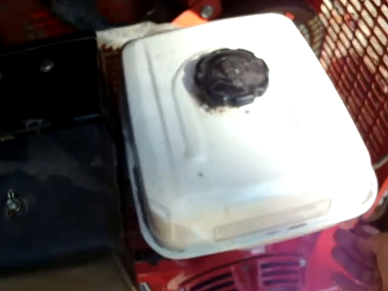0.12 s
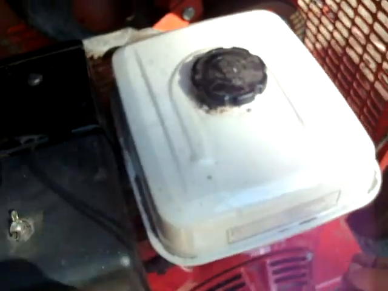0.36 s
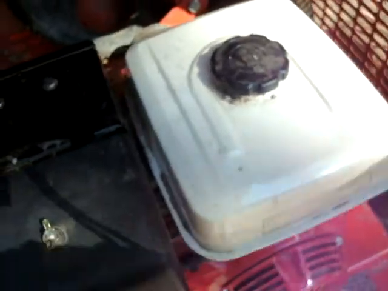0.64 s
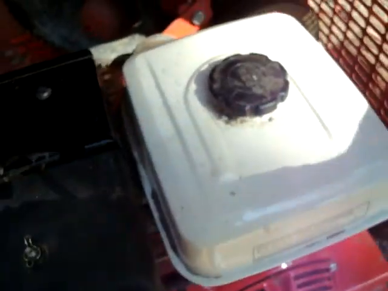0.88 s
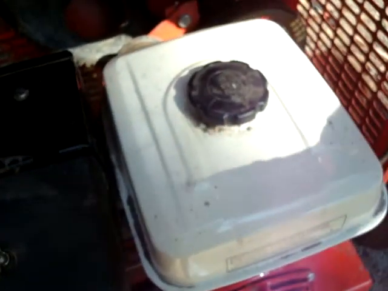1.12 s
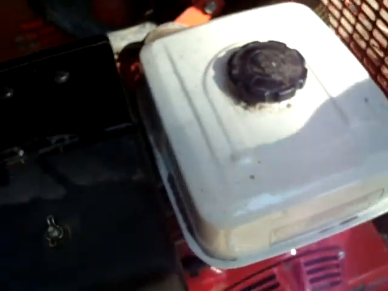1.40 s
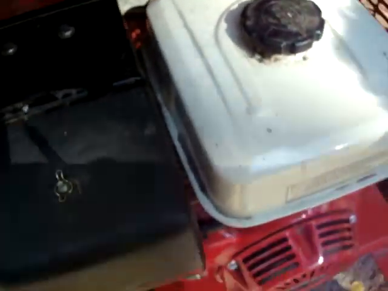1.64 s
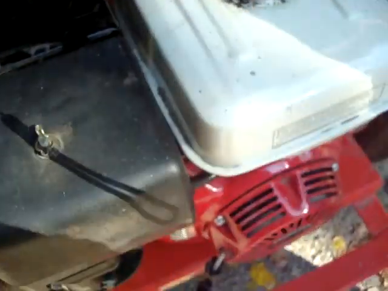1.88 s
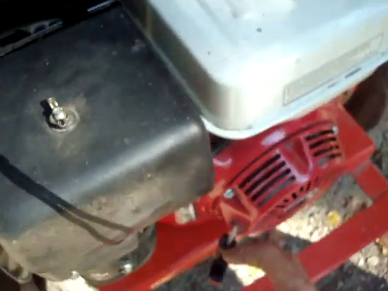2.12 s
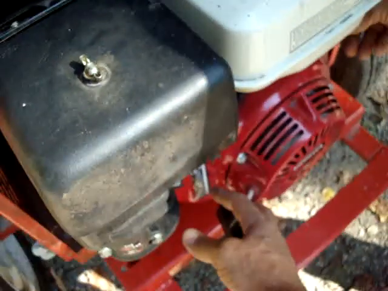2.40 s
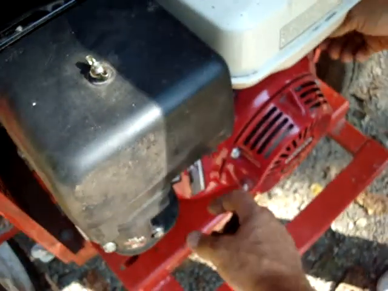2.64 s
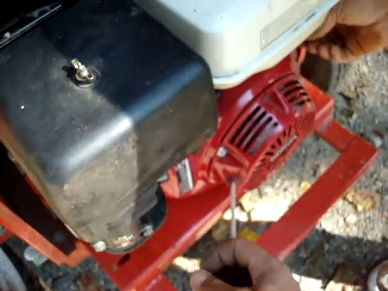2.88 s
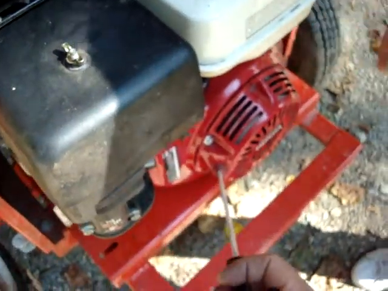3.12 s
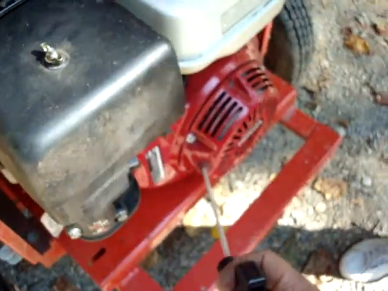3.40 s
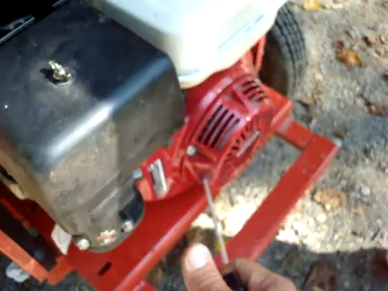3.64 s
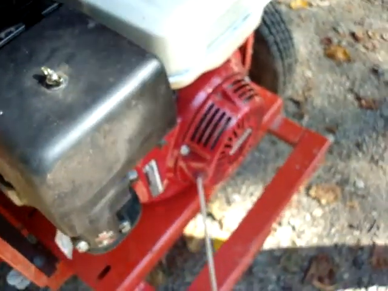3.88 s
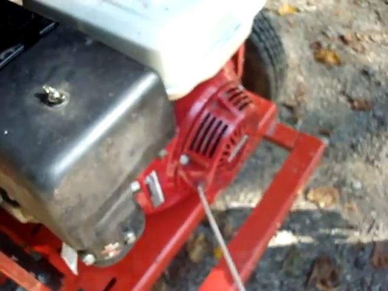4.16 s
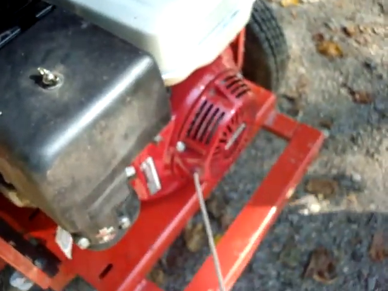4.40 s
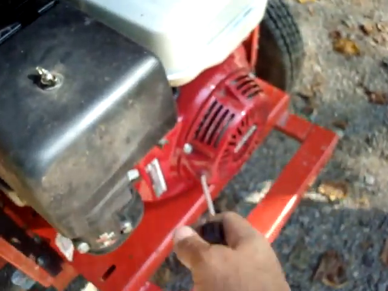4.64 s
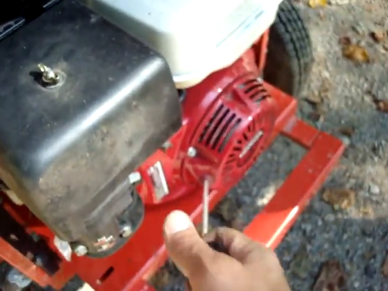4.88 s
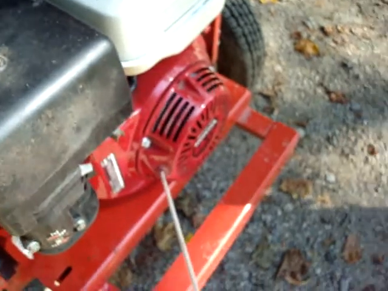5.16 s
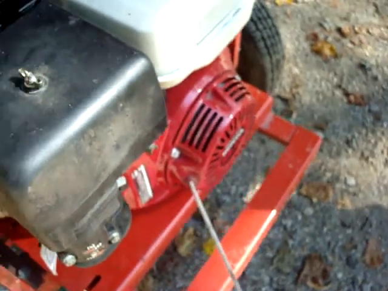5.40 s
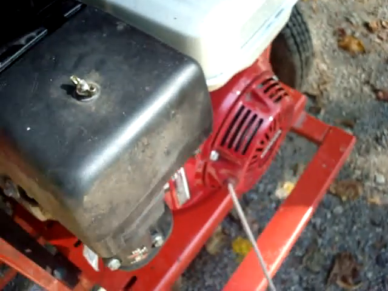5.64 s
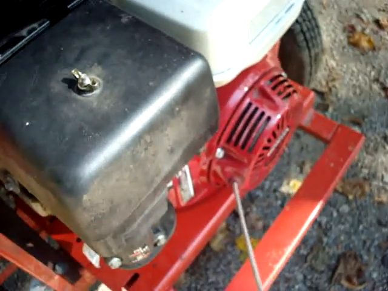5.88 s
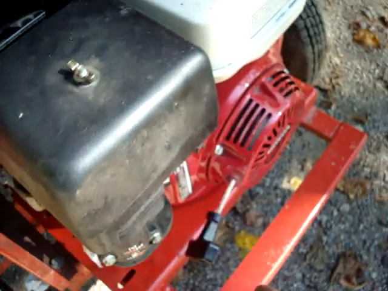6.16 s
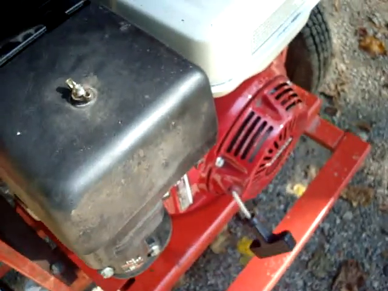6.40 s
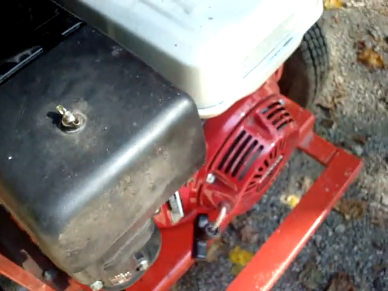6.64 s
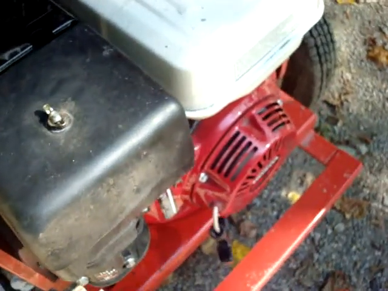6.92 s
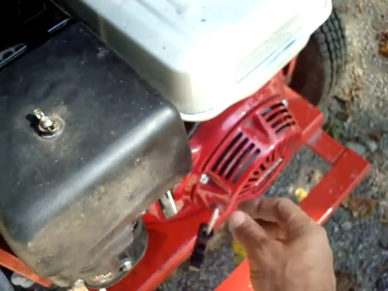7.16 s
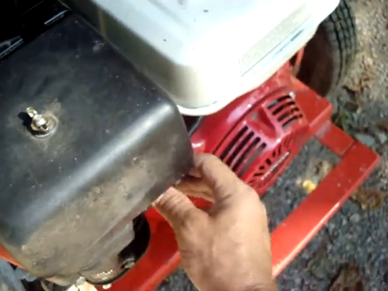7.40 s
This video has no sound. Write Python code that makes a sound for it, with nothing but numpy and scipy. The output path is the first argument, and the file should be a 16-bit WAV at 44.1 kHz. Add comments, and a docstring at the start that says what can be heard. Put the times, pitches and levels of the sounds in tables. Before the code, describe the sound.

Close outdoor microphone over soft distant traffic and low wind. Two noisy, hissing bangs come early and fade with a faint metal hum. Light rubs and clacks of a hand on a starter cord follow, then two rough bursts of rattling, knocking metal and piston thumps. Finally a small petrol engine catches, its separate puffs quickening into a loud, steady, rattling drone.

```python
"""A small one-cylinder petrol engine outdoors, close to the microphone: exhaust pulses ring pipe and muffler,
gas hisses, the valve knocks and the works rattle; it gathers speed and load into a steady drone.
Before it fires, a hand works the starter cord: rubs, clacks, blows on metal and thumps of the piston.
Behind it are distant traffic roar with a faint hum, low wind rumble and two hissing bangs,
all of shaped noise and decaying tones."""
import sys
import numpy as np
from scipy import signal
from scipy.fft import rfft, irfft, next_fast_len
from scipy.io import wavfile
from scipy.ndimage import uniform_filter1d

SR = 44100
rng = np.random.default_rng(int(sys.argv[2]) if len(sys.argv) > 2 else 0)


def master(y):
    """Save y as 16-bit WAV."""
    cut = np.clip(np.atleast_2d(y).T, -1, 1)
    pcm = np.round(cut * 32767)  # scale
    wavfile.write(sys.argv[1], SR, pcm.astype(np.int16))


def invert_db(x):
    """Field ratio 10**(x/20) for x, a level in decibels (scalar or array-like)."""
    u = np.asarray(x, float) / 20
    return 10 ** u


N = 332073
T = np.arange(N) / SR

# Firing rate of the running engine. Each row: time in seconds, rate in Hz.
SPEED = [(5.69, 5.97), (5.8, 6.84), (5.9, 8.08), (6.0, 10.48), (6.1, 14.03), (6.2, 18.2), (6.3, 22.56),
         (6.42, 24.69), (6.6, 24.73), (6.8, 24.9), (7.1, 25.09), (7.53, 25.35)]
# Load taken up by the engine. Each row: time in seconds, share 0-1.
LOAD = [(6.3, 0.02), (6.45, 0.13), (6.6, 0.43), (6.72, 0.82), (6.85, 0.91), (7.25, 1), (7.53, 0.98)]
FULL_SPEED_HZ = 25
# The firing pattern changes from catching to steady between these times, s.
STEADY_FROM_S = (6.33, 6.37)


def evened(x):
    """Scales to rms 1."""
    return x / np.sqrt(np.mean(x ** 2) + 1e-20)


def read(points, hz):
    """Reads a spectrum on a log-frequency axis."""
    f, value = np.transpose(points)
    return np.interp(np.log(hz + 1), np.log(f + 1), value)


def curve(rows, off_db=-120):
    """Gains of the dB columns of a table, off_db outside it."""
    s, *columns = np.transpose(rows)
    return [invert_db(np.interp(T, s, c, off_db, off_db)) for c in columns]


def noise(tone):
    """Steady noise of rms 1 with a given spectrum."""
    size = next_fast_len(N)
    z = rfft(rng.standard_normal(size)) * invert_db(read(tone, np.fft.rfftfreq(size, 1 / SR)))
    return evened(irfft(z, size)[:N])


def wander(hz):
    """Low-passed noise of rms 1, a slow random drift."""
    return evened(signal.lfilter(*signal.butter(1, hz, fs=SR), rng.standard_normal(N)))


def ring(x, modes):
    """Sum of two-pole resonances, each with its gain at its centre."""
    out = 0
    for hz, width_hz, db in modes:
        r = np.exp(-np.pi * width_hz / SR)
        pole = r * np.exp(2j * np.pi * hz / SR)
        out = out + invert_db(db) * 2 * signal.lfilter([1 - r], [1, -pole], x).real
    return out


def add(out, s, db, hz, t60, stray):
    """Adds one decaying tone with a soft start; stray is its relative pitch deviation."""
    part = out[round(s * SR):][:3 * SR // 2]
    t = np.arange(len(part)) / SR
    cycles = hz * np.cumsum(1 + stray[:len(t)]) / SR
    part += invert_db(db - 60 * t / t60) * (1 - np.exp(-t / 0.00061)) * np.sin(2 * np.pi * cycles)


def patchy(x, depth_db):
    """Colour that shifts in patches some 690 Hz wide and 29 ms long, milder from 6.8 s on."""
    _, t, z = signal.stft(x, SR, nperseg=256)
    patches = uniform_filter1d(rng.standard_normal(z.shape), 4, 0)
    patches = evened(uniform_filter1d(patches, 10, 1))
    calm = np.interp(t, (6.4, 6.8), (1, .4))
    return evened(signal.istft(z * invert_db(depth_db * calm * patches), nperseg=256)[1][:N])


def rippled(x):
    """A fixed random colour of narrow peaks some 40 Hz apart."""
    z = rfft(x)
    ripple_db = 2.5 * np.interp(np.arange(len(z)), np.linspace(0, len(z), 550), rng.standard_normal(550))
    return evened(irfft(z * invert_db(ripple_db), len(x)))


def roar():
    """Far traffic roar with a faint hum: sinks after the second bang, recovers, fades under the running engine."""
    # Each row: time in seconds, level in dB.
    roar_level = [(0.0, -29.5), (1.1, -31), (1.49, -29), (1.54, -27.5), (1.85, -36.5), (2.3, -38),
                  (3.65, -33), (4.3, -30), (4.65, -35), (5.6, -33), (5.9, -29), (7.53, -65)]
    # Each row: frequency in Hz, relative density in dB.
    roar_tone = [(82, -53), (140, -19.5), (371, -11.5), (541, -8), (603, -6), (791, 1), (881, 0.5),
                 (1110, 2.5), (1690, -3.5), (5640, -27.5), (7950, -31.5), (9870, -36), (10400, -71),
                 (13500, -73), (22000, -120)]
    # Each row: frequency in Hz, relative level in dB.
    hum_tones = [(118.4, -72), (193.8, -71), (296.1, -67.5), (409.1, -58)]
    lift_db = 35
    hum = 0
    for hz, db in hum_tones:
        level = invert_db(db + lift_db + 6.3 * wander(1.1))
        hum = hum + level * np.sin(2 * np.pi * hz * T + 0.49 * wander(2))
    return curve(roar_level)[0] * (invert_db(1.0 * wander(30)) * noise(roar_tone) + hum)


def wind():
    """Wind on the microphone: lumpy low rumble, gusts over a calm level."""
    # Each row: start in seconds, length in seconds, level in dB.
    gust_rows = [(-.3, 1.77, -55.5), (2.403, 0.56, -68), (3.38, 0.94, -61), (4.766, 0.2, -60.5),
                 (5.695, 0.58, -60), (6.875, 0.41, -78)]
    # Each row: frequency in Hz, relative density in dB.
    rumble_tone = [(12, -41), (20, -23.5), (108, 11.5), (130, 13), (200, -5), (260, -31), (440, -120)]
    calm_db, rise_s, fall_s = -73.5, 0.12, 0.03
    gain = invert_db(calm_db)
    for s, length, db in gust_rows:
        ramps = np.minimum((T - s) / rise_s, (s + length - T) / fall_s)
        gain = gain + invert_db(db) * np.clip(ramps, 0, 1)
    return gain * invert_db(2.0 * wander(5)) * noise(rumble_tone)


def bangs():
    """Noise bursts hold briefly, then bass drops at once, treble fades next and the middle lasts longest.

    A low push of air opens each; metal hums after the second."""
    # Each row: start in seconds, level in dB, rise in seconds, hold in seconds, factor on the decay time.
    bang_rows = [(1.121, -15.5, 0.0029, 0.01, 0.79), (1.478, -15, 0.014, 0.042, 1.32)]
    # One spectrum for each bang. Each row: frequency in Hz, relative density in dB.
    bang_tones = [
        [(18, -70), (30, -45), (151, -47), (285, -11), (513, -16.5), (900, -4), (1080, 3.5), (1250, -3.5),
         (1700, -9.5), (1920, -10), (6710, -18), (9450, -22.5), (10400, -30), (13500, -85), (22000, -120)],
        [(18, -72), (30, -47), (150, -41), (210, -23), (800, -15.5), (1100, -6), (1500, -4.5), (2200, 0),
         (3200, 0.5), (4300, -0.5), (4700, -4.5), (7000, -7.5), (9700, -19.5), (10400, -50), (22000, -120)],
    ]
    # Each row: frequency in Hz, t60 in seconds ahead of the bang's own factor.
    bang_decay = [(30, .05), (170, .05), (300, 1), (1000, 0.9), (2500, 0.69), (3400, 0.4), (4300, 0.35),
                  (4700, 0.21), (7000, 0.12), (10000, 0.072)]
    # Each row: frequency in Hz, level in dB, t60 in seconds.
    metal_hum = [(290, -49.5, 4.6), (555, -41, 2), (848, -36, 2.3), (1070, -28, 1.2)]
    # Push of air. Each row: frequency in Hz, relative density in dB.
    push_tone = [(10, -18), (30, -3), (150, 0), (300, -32), (600, -120)]
    push_db, push_s = -28, 0.0074  # level re the bang; time of the peak after its start
    out = 0
    for (s, db, rise, hold, slow), tone in zip(bang_rows, bang_tones):
        hz, t, z = signal.stft(rippled(noise(tone)), SR, nperseg=256)
        fading_s = np.maximum(t - s - rise - hold, 0)
        z = z * invert_db(-60 * fading_s / (slow * read(bang_decay, hz))[:, None])
        burst = signal.istft(z, SR, nperseg=256)[1][:N]
        out = out + invert_db(db) * np.clip((T - s) / rise, 0, 1) * burst
        push = np.exp(-((T - s - push_s) / push_s * 2) ** 2)
        out = out + invert_db(db + push_db) * push * noise(push_tone)
    for hz, db, t60 in metal_hum:
        add(out, bang_rows[1][0] + .01, db, hz, t60, np.zeros(N))
    return out


def rubs():
    """Hand, cord and pawls: each rub swells to its peak and falls; gains for casing, scrape and frame."""
    # Each row: peak in seconds, length in seconds, relative level in dB, lead in dB of bare scrape:
    # scrape is raised and casing rattle lowered by the lead.
    rub_rows = [(2.086, 0.14, -35.5, -8), (2.538, 0.93, -48.5, 8.5), (2.75, 0.12, -42.5, 1.5),
                (2.83, .2, -36.5, -5), (2.911, 0.067, -34.5, 0.5), (3.072, 0.16, -30, -2),
                (3.078, .04, -32, -3), (3.183, 0.068, -30, -4), (3.345, 0.96, -39.5, -6.5),
                (3.838, 0.03, -26.5, -10.5), (3.956, 0.17, -19, 1), (3.915, 0.025, -26, 4),
                (4.003, 0.089, -24, -9), (4.039, 0.083, -26.5, -10), (4.072, 0.026, -24, 10.5),
                (4.125, 0.072, -27, -3), (4.205, .02, -29, 3), (4.166, 0.053, -19.5, 0.5),
                (4.229, 0.18, -20.5, -4), (4.334, 0.12, -25.5, -8), (4.39, .015, -32, -15),
                (4.441, 0.069, -32, 4), (4.605, 0.025, -36, 4), (4.862, 0.4, -38, -7.5),
                (4.972, 0.043, -32, 3), (5.027, 0.063, -28, 3.5), (5.054, 0.074, -34, 6),
                (5.104, 0.12, -32, -7), (5.072, 0.031, -21, 1), (5.199, 0.062, -31, 9),
                (5.242, 0.051, -23, -2.5), (5.309, 0.11, -20.5, -6), (5.392, 0.099, -22, 3),
                (5.502, 0.75, -31.5, -0.5), (5.574, 0.015, -34, -21), (5.67, 0.18, -29.5, -7),
                (5.88, 0.015, -35, -14)]
    rise_share, ends_db, frame_db = 0.42, -18.5, -6.5  # peak's place in the length; level at both ends re peak
    out = np.zeros((3, N))
    for s, length, db, lead_db in rub_rows:
        away = np.maximum((s - T) / rise_share, (T - s) / (1 - rise_share)) / length
        out += invert_db(db + ends_db * away) * invert_db(np.array([[-lead_db], [lead_db], [frame_db]]))
    return out


def clacks():
    """Sharp clacks of the starter: bright noise bursts that rise in 0.6 ms, chatter briefly and fade."""
    # Each row: start in seconds, relative peak in dB, t60 in seconds.
    clack_rows = [(2.68, -41, 0.4), (2.735, -40, .5), (2.8, -45, 0.37), (2.89, -39, .3), (3.03, -37, .04),
                  (3.068, -30, 0.12), (3.171, -24.5, 0.059), (3.183, -32, 0.045), (3.911, -27.5, 0.03),
                  (3.938, -24.5, 0.067), (3.977, -13.5, 0.059), (4.07, -21, 0.018), (4.094, -21, 0.11),
                  (4.163, -24, 0.023), (4.2023, -47, 0.084), (4.2967, -26, 0.057), (4.4298, -38, 0.036),
                  (5.002, -13.5, 0.057), (5.02, -31, .1), (5.0443, -16, 0.071), (5.062, -21, 0.067),
                  (5.183, -33, 0.2), (5.234, -35, 0.059), (5.3393, -17.5, 0.059), (5.381, -21, 0.07),
                  (5.398, -24, 0.043), (5.415, -26, 0.043), (5.57, -27, 0.036), (5.609, -25.5, 0.065),
                  (5.7763, -28, 0.13), (5.914, -19, 0.069), (7.064, -10, .015)]
    # Each row: frequency in Hz, relative density in dB.
    clack_tone = [(180, -44.5), (300, -22), (1210, 3), (2160, -18.5), (2540, 0), (5190, 2), (7300, -4),
                  (9250, -4), (10400, -24), (13500, -56), (22000, -120)]
    hold_s = 0.0058  # for a t60 of 60 ms, in proportion for others
    shape = 0
    for s, db, t60 in clack_rows:
        fading_s = np.maximum(T - s - hold_s * t60 / .06, 0)
        shape = shape + np.clip((T - s) / 0.0006, 0, 1) * invert_db(db - 60 * (fading_s / t60) ** 0.91)
    return invert_db(-2.5) * shape * patchy(noise(clack_tone), depth_db=1.8)


def knocks():
    """Blows ring each object's modes by their motion at the place struck; parts ping, the piston thumps."""
    # Starter casing. Each row: start in seconds, relative peak in dB, place along the sheet 0-1.
    casing_blows = [(3.935, -13.5, 0.25), (4.006, -16, 0.41), (4.112, -20, 0.48), (4.25, -15.5, 0.32),
                    (4.966, -25, 0.14), (5.061, -24, 0.14), (5.068, -21, 0.36), (5.208, -27.5, 0.3),
                    (5.239, -20, 0.5), (5.299, -24, 0.2), (5.314, -19, 0.26), (5.342, -18.5, 0.2),
                    (5.397, -29, 0.2), (5.57, -22.5, 0.37), (5.776, -12, .47), (5.911, -11.5, 0.05),
                    (6.015, -13, 0.48), (6.109, -19, 0.24)]
    # Each row: frequency in Hz, relative level in dB, t60 in seconds.
    casing_ring = [(1160, -9.5, 0.35), (1293, 2.5, 0.12), (2570, -8.5, 0.18), (1508, -5.5, 0.23)]
    # The cord jerks the drum. Each row: start in seconds, relative peak in dB, place across the drum 0-1.
    drum_blows = [(3.175, -27, 0.35), (4.016, -16.5, 0.12), (4.213, -7.5, 0.42), (4.2205, -13.5, 0.27),
                  (4.234, -12, .48)]
    # Each row: frequency in Hz, relative level in dB, t60 in seconds.
    drum_ring = [(538, 4, 0.058), (721, 2.5, 0.096)]
    # Tube frame. Each row: start in seconds, relative peak in dB, place along the tube 0-1, factor on t60.
    frame_blows = [(1.123, -33, 0.23, 0.51), (2.919, -43, .49, 0.28), (3.178, -33, .49, 0.86),
                   (3.293, -31, 0.5, 0.17), (3.836, -24, 0, 0.16), (4.86, -31, 0.5, 0.077),
                   (5.064, -28.5, .49, 0.38), (5.09, -24, .49, 0.22)]
    # Each row: frequency in Hz, relative level in dB, t60 in seconds ahead of the blow's factor.
    frame_ring = [(413.6, -0.5, 0.92), (299, 1.5, 0.84), (896, 0.5, 0.35), (569, 6.5, 1)]
    # Piston going over compression. Each row: start in seconds, relative peak in dB, frequency in Hz.
    thump_rows = [(3.966, -25.5, 222), (4.073, -22, 205), (4.163, -20, 233), (4.213, -12, 183),
                  (4.322, -20, 277), (5.348, -30.5, 176), (5.429, -35, 180), (5.688, -22, 160),
                  (5.841, -26, 171)]
    # Small metal parts. Each row: start in seconds, relative peak in dB, frequency in Hz, t60 in seconds.
    ping_rows = [(3.01, -30, 3030, 0.1), (3.012, -33, 2900, .06), (4.312, -31, 3240, 0.17),
                 (5.389, -19, 3870, 0.38), (5.393, -17, 3890, 0.06), (5.414, -19, 3730, 0.06),
                 (6.021, -19.5, 3900, 0.099)]
    thump_t60_s = 0.05
    twin_ratio, twin_db = .987, -7  # each ping beats with a close lower partner
    out, waver = np.zeros(N), .012 * wander(25)  # relative pitch deviation
    blows = [(*row, 1, casing_ring) for row in casing_blows]
    blows += [(*row, 1, drum_ring) for row in drum_blows]
    blows += [(*row, frame_ring) for row in frame_blows]
    for s, db, place, slow, modes in blows:
        for k, (hz, mode_db, t60) in enumerate(modes, 1):
            place_db = 20 * np.log10(abs(np.sin(np.pi * k * place)) + 1e-3)
            add(out, s, db + mode_db + place_db, hz, slow * t60, waver[round(s * SR):])
    twins = [(s, db + twin_db, hz * twin_ratio, t60) for s, db, hz, t60 in ping_rows]
    thumps = [(*row, thump_t60_s) for row in thump_rows]
    for row in ping_rows + twins + thumps:
        add(out, *row, waver[round(row[0] * SR):] / 3)
    return out * invert_db(2.5 * np.clip(wander(40), -3, 1))


def clatter(turns):
    """Rattle of the compression stroke while the engine catches: opens late in the cycle, stops just after the
    firing."""
    from_share, to_share, until_hz = 0.5, 1.1, 20.8  # cycle shares; firing rate at which it has gone
    rate_hz = np.gradient(turns) * SR
    share = ((turns - from_share) % 1) / (to_share - from_share)
    gate = (turns > from_share) * (share < 1) * np.clip((until_hz - rate_hz) / 4, 0, 1)
    levels_db = np.array((-24, -25, -30))  # casing, scrape, frame, all relative
    return uniform_filter1d(gate, size=150) * invert_db(levels_db)[:, None]


def engine_gain(first_db, free_db, loaded_db, yields, late):
    """Gain from first_db to free_db with speed, giving way to loaded_db as load comes on.

    A larger yields drops the unloaded sound sooner; a larger late delays the loaded sound."""
    speed = np.clip(np.interp(T, *np.transpose(SPEED), 0) / FULL_SPEED_HZ, 0, 1)
    load = np.clip(np.interp(T, *np.transpose(LOAD), 0), 0, 1)
    loaded = load ** abs(late)
    free = (speed > 0) * invert_db(first_db + speed * (free_db - first_db)) * (1 - loaded) ** abs(yields)
    return free + invert_db(loaded_db) * loaded


def works(turns):
    """Grainy rubbing and rattling: it shakes the casing modes and the frame, and is heard as bare scrape."""
    # Each row: frequency in Hz, width in Hz, gain in dB.
    casing_modes = [(1120, 40, 3), (1255, 80, 10.5), (1921, 22, 5), (2487, 31, 2), (2700, 16, 5.5),
                    (3140, 29, 1), (3900, 50, -27)]
    # Each row: frequency in Hz, relative density in dB.
    scrape_tone = [(410, -25.5), (700, -7), (1090, -4.5), (1270, -1.5), (1580, -5.5), (2690, -5.5),
                   (3770, -9.5), (8700, -27.5), (9740, -33), (10400, -64), (13500, -72), (22000, -120)]
    # Each row: frequency in Hz, relative density in dB.
    shudder_tone = [(53, -49), (90, -34), (216, -11), (350, -1.5), (515, 7.5), (728, 4.5), (900, -2.5),
                    (1170, -25.5), (1980, -120)]
    swing_free_db, swing_loaded_db = 2, -0.5  # swing within a cycle
    snap_db, snap_share = 2, 0.42
    load = np.interp(T, *np.transpose(LOAD), 0)
    depth_db = swing_free_db + load * (swing_loaded_db - swing_free_db)
    depth_db = (T > STEADY_FROM_S[0] - .2) * depth_db
    beat_db = depth_db * np.cos(2 * np.pi * (turns - .15))
    thrum = (depth_db + 1.06 * load) * np.cos(2 * np.pi * (turns - .22))
    # under load the metal jumps at each firing, holds for snap_share of the cycle, then settles
    settling = np.clip((turns % 1 - snap_share) / (1 - snap_share), 0, 1)
    snap = snap_db * load * uniform_filter1d(1 - 2 * settling, size=40)
    running = [engine_gain(-45, -37, -21, 1, 0.5),
               engine_gain(-26.5, -25.5, -16, 2.5, 4.5),
               engine_gain(-39, -42, -35, 1, 1)]
    rattle, scrape, shudder = rubs() + clatter(turns) + running
    # the grain evens out as the firing turns steady
    grain = invert_db(np.interp(T, STEADY_FROM_S, [1.7, .8]) * (wander(70) + .7 * wander(400)))
    shaken = patchy(ring(grain * rng.standard_normal(N), casing_modes), depth_db=0.5)
    rubbed = patchy(grain * noise(scrape_tone), depth_db=1.8)
    low = evened(invert_db(2.5 * wander(21)) * noise(shudder_tone))
    out = rattle * invert_db(-9.0 + 3.1 * thrum + snap) * shaken
    out = out + scrape * invert_db(-2.0 + beat_db + .3 * snap) * rubbed
    return out + shudder * invert_db(-1.5) * low


def valve(turns):
    """At each firing a knock and a short rattle ring metal modes."""
    # Each row: frequency in Hz, width in Hz, relative gain in dB.
    valve_ring = [(1280, 70, 0), (700, 600, -19), (1900, 300, -16)]
    share = turns % 1
    knock = (np.diff(np.floor(turns), prepend=0) > 0) * invert_db(1.5 * wander(20))
    rattle = .16 * (share < .4) * np.sin(np.pi * (share + .1) / .5) * rng.standard_normal(N)
    struck = ring((knock + rattle) * (T > LOAD[0][0]), valve_ring)
    return engine_gain(-80, -60, -33.5, 1, 3) * evened(struck)


def drone(turns):
    """At speed each cycle repeats: a tone on every multiple, phased as a swell that ends in one pulse."""
    # Each row: multiple of the firing rate, relative level in dB.
    drone_tones = [(1, -48), (2, -39), (3, -49.5), (4, -52.5), (5, -19.5), (6, -12.5), (7, -18), (8, -14),
                   (9, -6.5), (10, -18), (11, -13), (12, -7), (13, -13.5), (14, -26), (15, -6), (16, -6.5),
                   (17, -5), (18, -11), (19, -14), (20, -11.5), (21, -8), (22, -6), (23, 3), (24, -3),
                   (25, -8), (26, -11), (27, -9), (28, -13), (29, -8), (30, -18), (31, -7), (32, -10),
                   (33, -7.5), (34, -9.5), (35, -4.5), (36, -18)]
    order, db = np.transpose(drone_tones)
    log_gain = np.log(invert_db(np.r_[db[0], db, np.full(28, db[-1] - 30)]))
    # phase of a ringing pulse turned back to front
    phase = 0.66 * signal.hilbert(np.r_[log_gain, log_gain[-2:0:-1]]).imag[1:]
    turns = turns + .002 * wander(8)  # no two cycles last quite as long
    tones = sum(invert_db(d) * np.cos(2 * np.pi * k * (turns - .36) + p) for k, d, p in zip(order, db, phase))
    return evened(tones) * invert_db(0.71 * wander(52))


def pulses(turns, chance):
    """Three exhaust pressure pulses a cycle: low thuds of the pipe and the ringing muffler."""
    # Each row: share of the cycle, relative thud in dB, relative ring in dB.
    pulses_catching = [(-.01, 7.5, 3.5), (0.281, 0, 5), (0.6, 5.5, -3)]
    # Each row: share of the cycle, relative thud in dB, relative ring in dB.
    pulses_steady = [(0.06, -12, -9.5), (0.329, -15, 4), (0.701, 5, -28)]
    # The muffler note builds. Each row: time in seconds, relative level in dB.
    ring_grows = [(6.34, -9.5), (6.37, -9.5), (6.6, -3), (6.75, 3)]
    # Each row: frequency in Hz, width in Hz, relative gain in dB.
    thud_modes = [(149, 20, -22), (218, 38, 6), (284, 61, 7), (380, 56, 6)]
    # Each row: frequency in Hz, width in Hz, relative gain in dB.
    muffler_modes = [(570, 83, 12.5), (487, 190, -7), (790, 310, -14)]
    thud_gain = engine_gain(-50.5, -40.5, -70, 32, 1.9)
    ring_gain = engine_gain(-28, -25.5, -43.5, 11, 7.5)
    rate_hz = np.gradient(turns) * SR
    steady = np.interp(T, STEADY_FROM_S, [0, 1])
    thuds, rings = np.zeros((2, N))
    for k, (early, late) in enumerate(zip(pulses_catching, pulses_steady)):
        share, thud_db, ring_db = (a + steady * (b - a) for a, b in zip(early, late))
        at = np.flatnonzero(np.diff(np.floor(turns - share)) > 0)
        size = invert_db(0.4 * chance[:len(at), k]) / np.sqrt(rate_hz[at] + 1)  # near equal power at any speed
        grown_db = np.interp(T[at], *np.transpose(ring_grows))
        thuds[at] += size * invert_db(thud_db[at]) * thud_gain[at]
        rings[at] += size * invert_db(ring_db[at] + grown_db) * ring_gain[at]
    no_bass = signal.butter(4, 120, "high", fs=SR, output="sos")
    low = signal.sosfilt(no_bass, ring(thuds, thud_modes))
    return invert_db(55.0) * low + invert_db(52.5) * ring(rings, muffler_modes)


def gas_hiss(turns, chance):
    """Hot gas hisses as the valve opens: puffs of noise with a tail through the muffler."""
    # Each row: frequency in Hz, relative density in dB.
    hiss_tone = [(590, -29), (1000, -39), (1340, -5), (1540, 0), (3280, 8.5), (4230, 2.5), (5090, 5),
                 (9630, -4.5), (10400, -23), (13500, -52), (22000, -120)]
    # Strength of single firings; below 0 dB they open softly. Each row: time in seconds, change in dB.
    firing_strength = [(5.843, 0.1), (5.962, 1.5), (6.055, 0), (6.13, .5), (6.186, 1.5), (6.24, 0.1),
                       (6.289, 0.1), (6.333, 0.1), (6.377, 0.1), (6.42, 3), (6.459, -0.5), (6.5, 0),
                       (6.541, -0.5), (6.585, -2), (6.625, -3), (6.662, 3), (6.745, 1.5), (6.87, 0)]
    valve_lag_s, first_puff_db = 0.00052, -10  # the first firing is feeble
    rise_s, catch_rise_s, soft_rise_s = 0.00059, 0.002, 0.0031  # the last two add at low speed, at soft firings
    hold_share, fall_s, tail_db, tail_s = .1, 0.0062, -10, .03
    rate_hz = np.gradient(turns) * SR
    opened = turns - valve_lag_s * rate_hz
    since_s = (opened % 1) / np.maximum(rate_hz, 1)
    firings = [(abs(T - since_s - s) < .015, db) for s, db in firing_strength]
    rise = rise_s + catch_rise_s * np.clip(1 - rate_hz / FULL_SPEED_HZ, 0, 1)
    rise = rise + soft_rise_s * sum(w * (db < 0) for w, db in firings)
    fading_s = np.maximum(since_s - hold_share / np.maximum(rate_hz, 15), 0)
    fall = np.exp(-fading_s / fall_s) + invert_db(tail_db) * np.exp(-since_s / tail_s)
    puff = (1 - np.exp(-since_s / rise)) * fall * invert_db(sum(w * db for w, db in firings))
    cycle = np.clip(opened, 0, 59).astype(int)
    puff = puff * invert_db(.7 * chance[cycle, 0] + .8 * wander(300))
    puff = puff * invert_db(first_puff_db * (opened < 1))
    hiss = (opened > 0) * puff * np.sqrt(25 / np.maximum(rate_hz, 1)) * patchy(noise(hiss_tone), depth_db=1.5)
    return invert_db(11.5) * engine_gain(-35.5, -28.5, -35, 1.5, 0.53) * hiss


def exhaust(turns):
    """Pulses, gas hiss and drone of the exhaust; pulses and puffs each vary in strength by chance."""
    chance = rng.standard_normal((60, 3))
    tones = engine_gain(-67, -43, -29, -3, 1.5) * drone(turns)
    return pulses(turns, chance) + gas_hiss(turns, chance) + tones


def scene():
    """Everything reaches one microphone; the engine has a few reflections off ground and frame."""
    s, hz = np.transpose(SPEED)
    turns = np.cumsum(np.interp(T, s, hz, 0)) / SR - 1e-3  # engine cycles since the first firing
    engine = works(turns) + clacks() + knocks() + exhaust(turns) + valve(turns)
    no_bass = signal.butter(3, 110, "high", fs=SR, output="sos")
    engine = signal.sosfilt(no_bass, engine)  # too small to radiate deep bass
    reflections = [(.0047, -33), (.011, -38), (.023, -47)]  # lag s, dB
    echo = sum(invert_db(db) * np.roll(engine, round(lag * SR)) for lag, db in reflections)
    return (engine + echo + roar() + wind() + bangs())[None]


def top_cut(x):
    """Nothing passes above the cut-off."""
    return signal.sosfilt(signal.butter(12, 10570, fs=SR, output="sos"), x)


def record(dry):
    """A soft overload, then a steep band limit at 10250 Hz."""
    soft = .8 * np.tanh(dry / .8)
    edge = signal.firwin(801, 10250, window=("kaiser", 9), fs=SR)
    return top_cut(signal.oaconvolve(soft, edge[None], "same"))


dry = scene()
out = record(dry)
master(out)
```